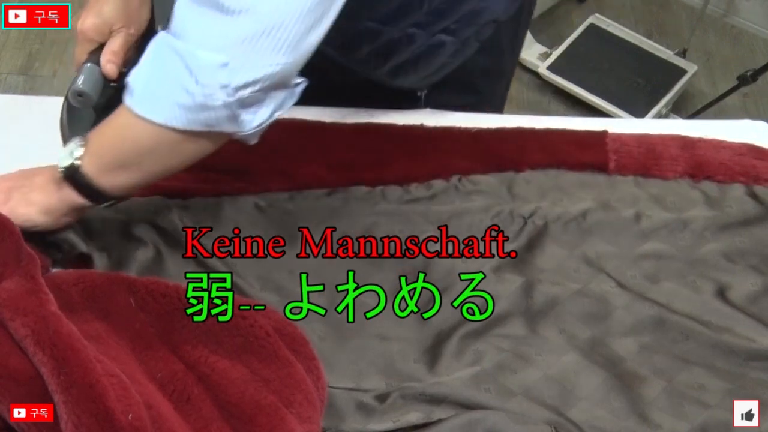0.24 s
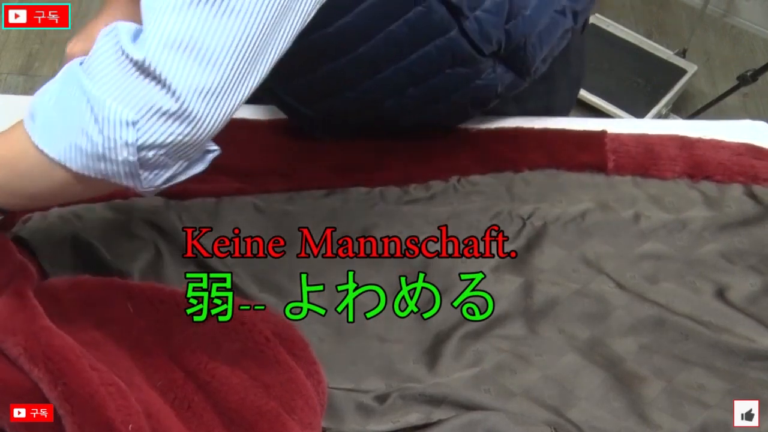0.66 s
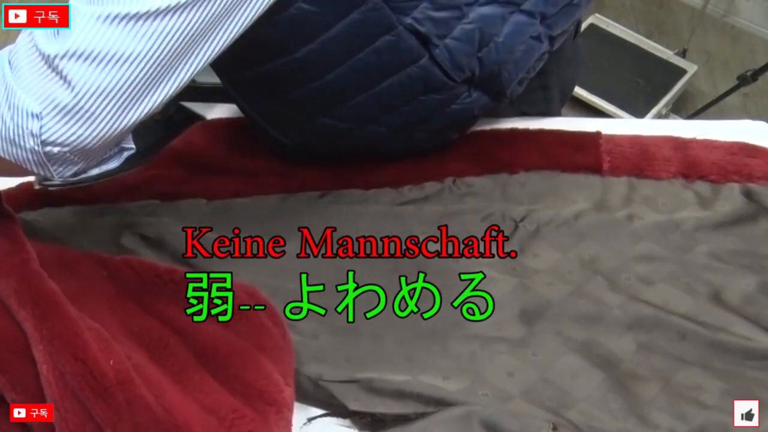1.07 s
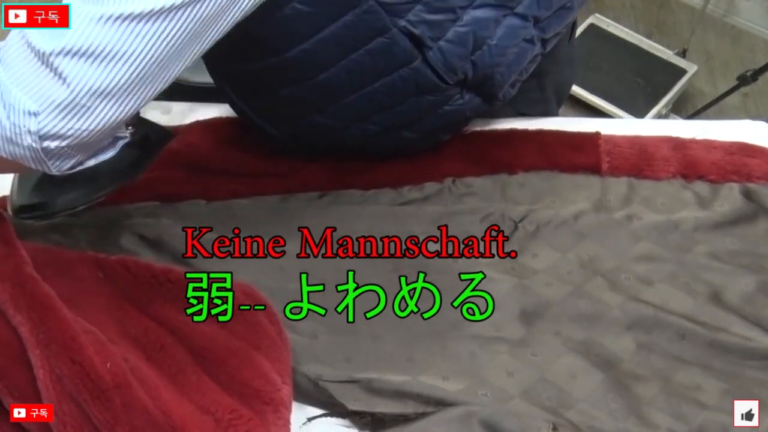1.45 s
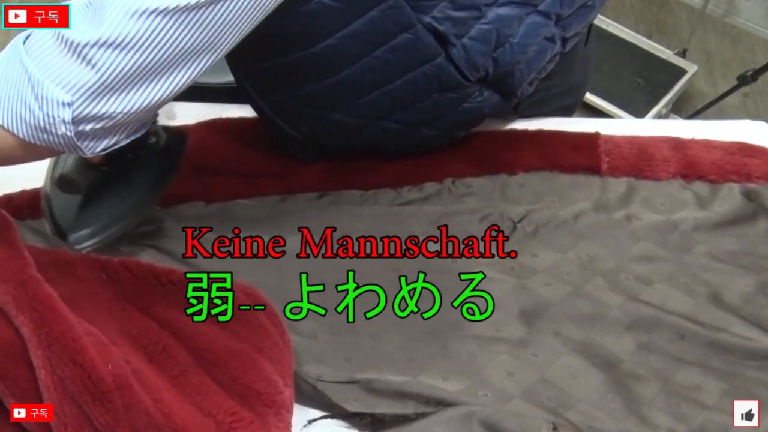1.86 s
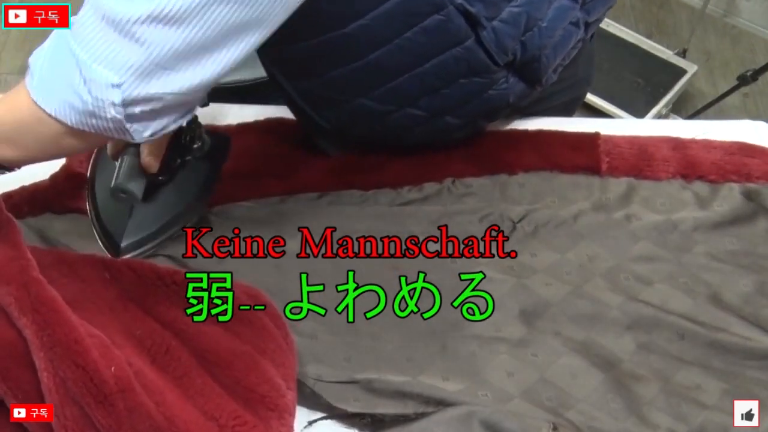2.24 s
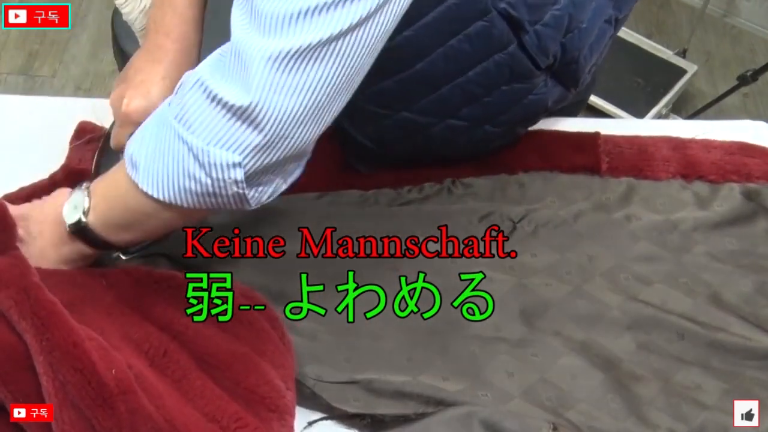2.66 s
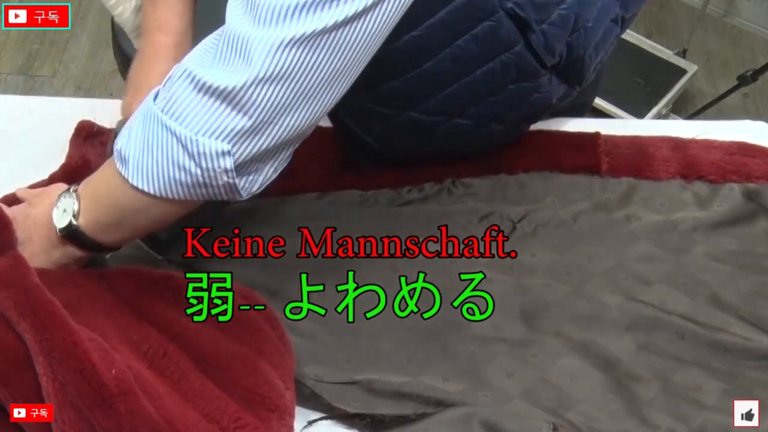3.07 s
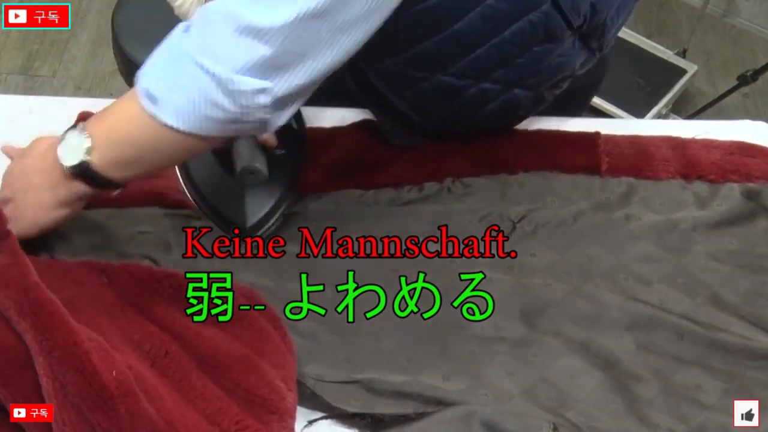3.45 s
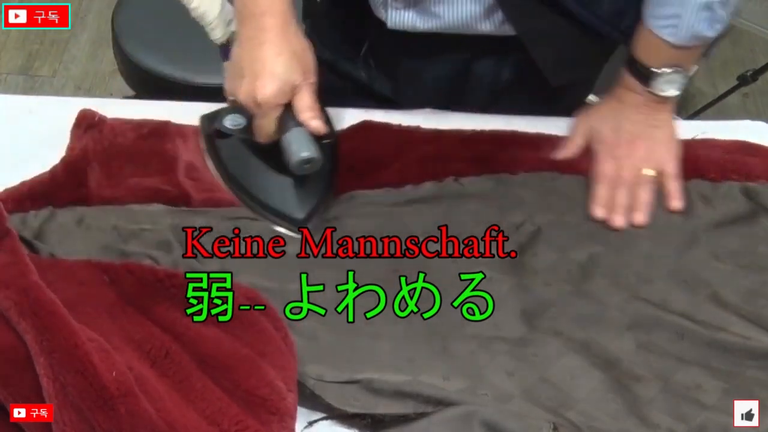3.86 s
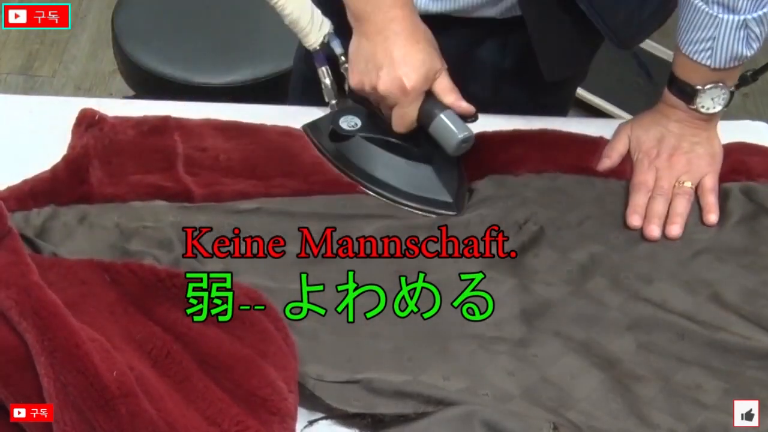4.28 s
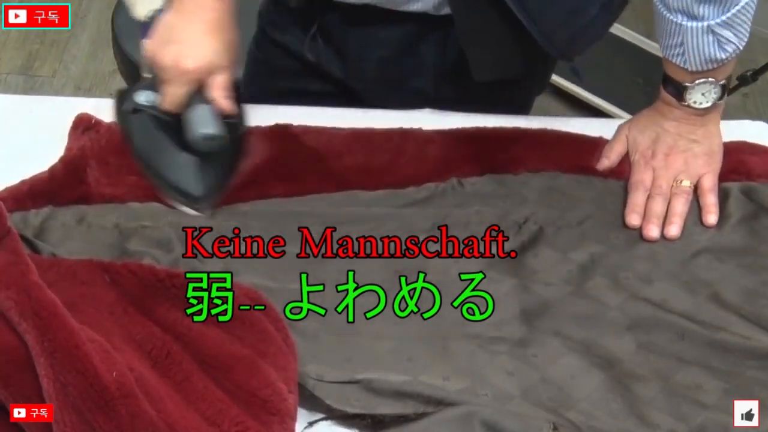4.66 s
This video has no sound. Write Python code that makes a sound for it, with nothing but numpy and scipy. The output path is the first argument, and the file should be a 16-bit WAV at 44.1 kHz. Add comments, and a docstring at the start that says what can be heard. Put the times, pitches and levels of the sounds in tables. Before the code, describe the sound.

At a pressing table in a tailor's workshop, air rushes evenly over a throbbing low motor hum, mostly on the right. An iron glides across a coat at the start, with soft board rumbles and a short scrape following, then a second run of swishes. Cloth folds rustle and a shirt sleeve brushes on the left. Faint ticks, two short whistles of air and wavering low tones stay in the background.

```python
"""The blower of a tailor's suction table runs while a steam iron slides over a coat.
Heard in the workshop, at the table, on two microphones; the right one is much the louder.
The motor's magnetic hum beats against twice its shaft rate; air rushes evenly through the ducts.
The soleplate swishes and scrapes, the padded board rumbles under it, folds and a sleeve rustle.
Behind these lie a few faint ticks, two brief whistles of air and faint wavering low tones."""
import sys
import numpy as np
from scipy import signal
from scipy.fft import rfft, irfft
from scipy.io import wavfile

SR = 44100
rng = np.random.default_rng(int(sys.argv[2]) if len(sys.argv) > 2 else 0)


def pcm_store(signal):
    """Save signal as 16-bit PCM."""
    levels = np.round(np.clip(np.atleast_2d(signal), -1, 1) * 32767)
    wavfile.write(sys.argv[1], SR, levels.astype(np.int16).T)


N = 212606
TIME = np.arange(N) / SR
FREQ = np.maximum(np.arange(N // 2 + 1) * SR / N, 1)
TOP_HZ = 11750

MAINS_HZ, SHAFT_HZ, BEAT_CREST_S = 60, 58.9, .022
HUM_LAG_S, RIGHT_LAG_S = .00041, .00089  # delay to the right microphone: hum; air and board
HUM_TIME = TIME - BEAT_CREST_S - np.array([[0], [HUM_LAG_S]])
# magnetic hum of the motor: mains_multiple, level_db, waver_fraction
MAINS_HARMONICS = [(2, -24, 0.1), (6, -42.5, 0.13), (8, -46.5, 0.57)]
# tones of the turning shaft: shaft_multiple, level_db, waver_fraction
SHAFT_HARMONICS = [(1, -43.5, .05), (2, -26, 0.22), (8, -62, 0.091)]
# rushing air before its peaks and dips: frequency_hz, left_db_per_hz, right_db_per_hz
AIR_SPECTRUM = [(25, -76, -76), (42, -75, -67), (50, -79, -62), (79, -65, -49.5), (126, -62.5, -46),
                (217, -63.5, -49), (420, -67, -56.5), (696, -81.5, -59), (820, -80.5, -68),
                (1180, -91, -68), (1384, -88.5, -72), (2710, -98.5, -78), (4800, -99.1, -84.5),
                (5470, -101.7, -86.5), (12400, -103.4, -93.5)]
# peaks and dips that colour the rushing air: centre_hz, width_hz, left_lift_db, right_lift_db
AIR_COLOUR = [(202, 51, 1, 3.5), (472.5, 27, 10.5, 5.5), (580, 16, 3, 3), (672, 36, 0, 3.5),
              (782, 36, 9, 4), (905, 100, -5, 5), (1097, 70, 8, 4.5), (1202, 20, 6, 4), (1250, 35, 0, 4.5),
              (1600, 33, -5, 6.5), (1877, 61, -1, 4), (3200, 140, 3, 2.5), (3760, 260, -2, -4),
              (4700, 1820, 0, 3.5), (5680, 300, -2, -3), (6870, 380, -2, 3.5), (8560, 200, -2, 2.5)]
# likeness of the air at the two microphones: frequency_hz, correlation
AIR_LIKENESS = [(40, 0.5), (110, 0), (230, 0.46), (330, 0.72), (550, 0.04), (750, 0.7), (1000, 0.06),
                (2000, 0)]

# friction of the soleplate on the coat: frequency_hz, relative_db
SOLEPLATE_SPECTRUM = [(500, -24), (1500, 10), (2600, 13), (3700, 8), (5200, 4.5), (6200, 0), (8500, -3.5),
                      (11500, -6.5)]
# glides of the soleplate: start_s, length_s, level_db, brightness_db
SOLEPLATE_GLIDES = [(0, 0.24, -42, 11), (0.25, 0.25, -44.5, 7), (0.648, 0.4, -46.5, 5),
                    (1.295, 0.22, -57, 8), (1.652, .19, -53, 4), (2.98, 0.25, -51, 11),
                    (3.58, 0.18, -44.5, 5), (3.706, 0.22, -42, 13), (3.85, 0.19, -42.5, 5.5),
                    (4.05, 0.3, -51, 0), (4.39, 0.44, -48.5, 0)]
# friction of the shirt sleeve: frequency_hz, relative_db
SLEEVE_SPECTRUM = [(500, 2), (1200, 13), (3000, 19), (4500, 5), (6000, 9), (8500, 1), (11500, 0)]
# brushes of the sleeve: start_s, length_s, level_db, brightness_db
SLEEVE_BRUSHES = [(0, 0.25, -54, 2), (0.385, 0.37, -58, 2), (.85, 0.25, -57, 3), (1.28, .24, -63, 0),
                  (1.67, .2, -64, 0), (2.23, 0.28, -68, 0), (2.69, .08, -53.5, 5), (3.548, 0.32, -59, 7),
                  (4.35, .47, -60, 7)]
# the iron is leant on the board: start_s, length_s, level_db
BOARD_PRESSES = [(1.11, 0.17, -31), (1.67, 0.095, -29), (2.385, 0.25, -32), (3.015, 0.16, -33),
                 (4.364, 0.34, -31.5)]
# damped resonances of the padded board: centre_hz, width_hz, left_gain_db, right_gain_db
BOARD_RESONANCES = [(320, 180, -10.5, 0), (696, 130, -32, -4.5), (1140, 280, -47, -13.5)]
# scrapes of the iron: start_s, length_s, level_db
IRON_SCRAPES = [(3.083, 0.17, -38)]
# resonances of the iron's body: centre_hz, width_hz, gain_db
IRON_RESONANCES = [(1010, 90, -2.5), (1170, 90, -8), (1600, 49, -11)]
# shifting folds of the coat: start_s, length_s, level_db, centre_hz, width_hz
FOLD_RUSTLES = [(0.103, 0.1, -48, 4200, 6500), (0.812, .035, -55, 8500, 6000),
                (1.66, 0.16, -56, 6000, 3000), (2.392, 0.082, -46, 1900, 900),
                (3.737, 0.06, -52, 6800, 7500), (3.84, 0.055, -44.5, 4000, 3600),
                (3.897, 0.115, -49, 4200, 3400)]
# small knocks of cuff and iron: start_s, left_db, right_db, centre_hz, width_hz, decay_s
KNOCKS = [(2.057, -50, -55, 1900, 800, .012), (2.496, -50, -53, 2000, 1200, .004),
          (2.775, -42, -45, 5500, 7000, 0.0016), (3.569, -45, -48, 7500, 5000, .001)]

# faint whistles in the rush of air: start_s, length_s, level_db, pitch_hz
AIR_WHISTLES = [(0.783, 0.32, -38.5, 719), (2.78, 0.38, -44, 1040)]
# faint wavering low tones in the background: pitch_hz, level_db, unsteadiness_fraction
LOW_TONES = [(53.5, -49, 0), (80.15, -38.5, 0.22), (134.4, -34.5, 0.8), (258.8, -44, .4),
             (423, -45.5, 0.46)]


def motor(left_db=-12.5):
    """The shaft slips behind the mains, so their second multiples beat about twice a second."""
    hum = 0
    for base_hz, harmonics in ((MAINS_HZ, MAINS_HARMONICS), (SHAFT_HZ, SHAFT_HARMONICS)):
        for multiple, db, waver in harmonics:
            tone = np.sqrt(2) * np.cos(2 * np.pi * multiple * base_hz * HUM_TIME)
            hum = hum + undb(db) * (1 + waver * walk(25)) * tone
    return on_right(hum, left_db)


def airflow(flutter_db=.63):
    """Turbulent air rushes through the ducts; the two microphones hear it partly alike."""
    hz, *mics_db = np.transpose(AIR_SPECTRUM)
    air_db = np.array([over_freq(hz, db) for db in mics_db])
    lift_db = sum(np.outer(lifts, bell(centre, width)) for centre, width, *lifts in AIR_COLOUR)
    alike = over_freq(*np.transpose(AIR_LIKENESS))
    shared, own = rfft(rng.standard_normal((2, N))) * np.sqrt(SR / 2)
    left = alike * shared + np.sqrt(1 - alike ** 2) * own
    right = shared * np.exp(-2j * np.pi * FREQ * RIGHT_LAG_S)
    rush = irfft(np.array([left, right]) * undb(air_db + lift_db), N)
    return rush * undb(flutter_db * walk(27))


def soleplate():
    """The soleplate drags over the coat on the right and still creeps between glides."""
    friction = rub(SOLEPLATE_SPECTRUM, catch_db=1.1)
    swish = strokes(friction, SOLEPLATE_GLIDES, attack_s=.06, release_s=.093, rest_db=-59.5)
    return on_right(swish, left_db=-21)


def sleeve():
    """The shirt sleeve brushes along at the left microphone only and stirs between brushes."""
    friction = rub(SLEEVE_SPECTRUM, catch_db=-1)
    brush = strokes(friction, SLEEVE_BRUSHES, attack_s=.05, release_s=.06, rest_db=-69)
    return np.array([brush, np.zeros(N)])


def board():
    """The padded board rumbles in its resonances while the iron is leant on it."""
    force = hand_force(BOARD_PRESSES, attack_s=.094, release_s=.12)
    rumble = sum(np.outer(undb(mics_db), ring(hz, width)) for hz, width, *mics_db in BOARD_RESONANCES)
    left, right = force * rumble
    return np.array([left, np.interp(TIME - RIGHT_LAG_S, TIME, right)])


def scrapes():
    """Friction sets the body of the iron ringing while it is pushed along."""
    force = hand_force(IRON_SCRAPES, attack_s=.086, release_s=.065)
    body = sum(undb(db) * ring(hz, width_hz) for hz, width_hz, db in IRON_RESONANCES)
    return on_right(force * body, left_db=-22)


def rustles(catch_db=1.5):
    """Folds of cloth shift in short bursts of tiny slips, each fold in its own band."""
    folds = 0
    for start_s, length_s, db, hz, width_hz in FOLD_RUSTLES:
        crackle = colour(slips(grain_db=9), bell(hz, width_hz) ** 2)
        fade = envelope(start_s, length_s, attack_s=.02, release_s=.021)
        folds = folds + undb(db) * fade * crackle
    return on_right(folds * undb(catch_db * walk(60)), left_db=-16)


def ticks():
    """Cuff and iron knock a little to the left, damped at once by the padded table."""
    out = np.zeros((2, N))
    for start_s, left_db, right_db, hz, width_hz, decay_s in KNOCKS:
        fade = (TIME >= start_s) * np.exp(-np.abs(TIME - start_s) / decay_s)
        knock = np.array([undb(db) * ring(hz, width_hz) for db in (left_db, right_db)])
        out += fade * knock
    return out


def whistles(width_hz=18, fade_s=.13):
    """Now and then the air sings briefly on one unsteady note."""
    notes = 0
    for start_s, length_s, db, hz in AIR_WHISTLES:
        notes = notes + undb(db) * ring(hz, width_hz) * envelope(start_s, length_s, fade_s, fade_s)
    return on_right(notes, left_db=-20)


def low_tones(left_db=-12.5):
    """Faint low tones sound in the background, most of them wavering in level and phase."""
    tones = 0
    for hz, db, unsteady in LOW_TONES:
        sway = (1 + unsteady * (walk(1.2) + 1j * walk(5.2))) / np.sqrt(1 + 2 * unsteady ** 2)
        tone = np.sqrt(2) * np.exp(2j * np.pi * (hz * HUM_TIME + rng.random()))
        tones = tones + undb(db) * np.real(sway * tone)
    return on_right(tones, left_db)


def slips(grain_db):
    """Fibres catch and slip in dense tiny clicks of uneven size."""
    size = np.minimum(rng.exponential(size=N), 4)
    return rng.standard_normal(N) * undb(grain_db * size)


def rub(spectrum, catch_db, patchy_db=3.5, patch_rate_hz=9):
    """Cloth friction: patches of the weave favour now one band, now another."""
    hz, db = np.transpose(spectrum)
    gain = undb(over_freq(hz, db)) * np.minimum(FREQ / hz[0], 1) * (FREQ < TOP_HZ)
    friction = rfft(colour(slips(grain_db=6), gain))
    bands = (irfft(friction * over_freq(hz, band), N) for band in np.eye(len(hz)))
    patchy = sum(band * undb(patchy_db * walk(patch_rate_hz)) for band in bands)
    return patchy * undb(catch_db * walk(60))


def strokes(friction, rows, attack_s, release_s, rest_db):
    """Friction follows the hand: each stroke swells and slows with its own force and brightness."""
    power, tilt = undb(rest_db) ** 2, 0
    for start_s, length_s, db, bright_db in rows:
        stroke = (undb(db) * envelope(start_s, length_s, attack_s, release_s)) ** 2
        power = power + stroke
        tilt = tilt + bright_db * stroke
    return brighten(friction, tilt / power) * np.sqrt(power)


def brighten(x, bright_db, pivot_hz=6000):
    """Tilt a sound about a pivot: lighter, quicker contact has more treble."""
    high = irfft(rfft(x) / (1 + (pivot_hz / FREQ) ** 4), N)
    return high * undb(bright_db / 2) + (x - high) * undb(-bright_db / 2)


def hand_force(rows, attack_s, release_s):
    """The hand bears down and eases off, once for each row."""
    return sum(undb(db) * envelope(start, length, attack_s, release_s) for start, length, db in rows)


def envelope(start_s, length_s, attack_s, release_s):
    """Swell, hold and fade; start and end lie halfway up the slopes."""
    rise = np.clip((TIME - start_s) / attack_s + .5, 0, 1)
    fall = np.clip((start_s + length_s - TIME) / release_s + .5, 0, 1)
    return rise * fall


def on_right(x, left_db):
    """Place a source on the right: full level there, left_db at the left microphone."""
    return x * undb([[left_db], [0]])


def ring(hz, width_hz):
    """One resonance driven by noise, at rms 1."""
    return colour(rng.standard_normal(N), bell(hz, width_hz))


def walk(rate_hz):
    """Smooth random drift of spread 1 that changes about rate_hz times a second."""
    return colour(rng.standard_normal(N), np.exp(-(FREQ / rate_hz) ** 2))


def colour(x, gain):
    """Filter by a gain per frequency; the result has rms 1."""
    filtered = irfft(rfft(x) * gain, N)
    return filtered / np.std(filtered)


def bell(hz, width_hz):
    """A bell-shaped peak of height 1 over frequency."""
    return 1 / (1 + (2 * (FREQ - hz) / width_hz) ** 2)


def over_freq(hz, values):
    """Join points by straight lines on a log-frequency axis."""
    return np.interp(np.log(FREQ), np.log(hz), values)


def undb(db):
    """Decibels to gain."""
    return 10 ** (np.asarray(db) / 20)


def scene():
    """Blower, handwork and background as they reach the left and right microphones."""
    blower = motor() + airflow()
    handwork = soleplate() + sleeve() + board() + scrapes() + rustles() + ticks()
    return blower + handwork + whistles() + low_tones()


def record(dry):
    """The recorder cuts the treble steeply above TOP_HZ."""
    return signal.sosfilt(signal.ellip(12, .1, 80, TOP_HZ, fs=SR, output="sos"), dry)


dry = scene()
out = record(dry)
pcm_store(out)
```